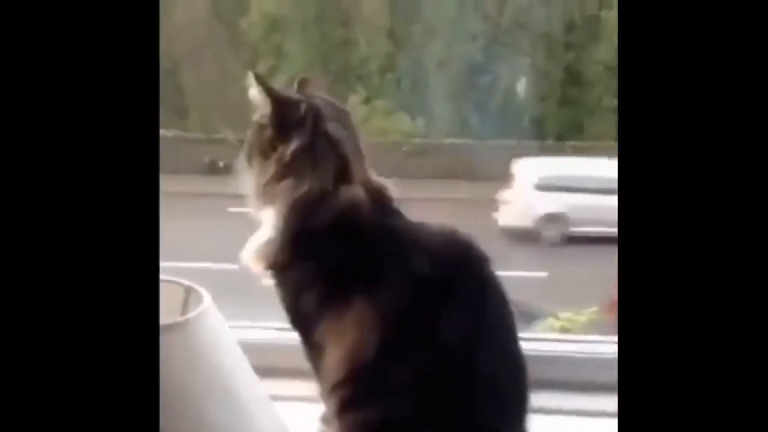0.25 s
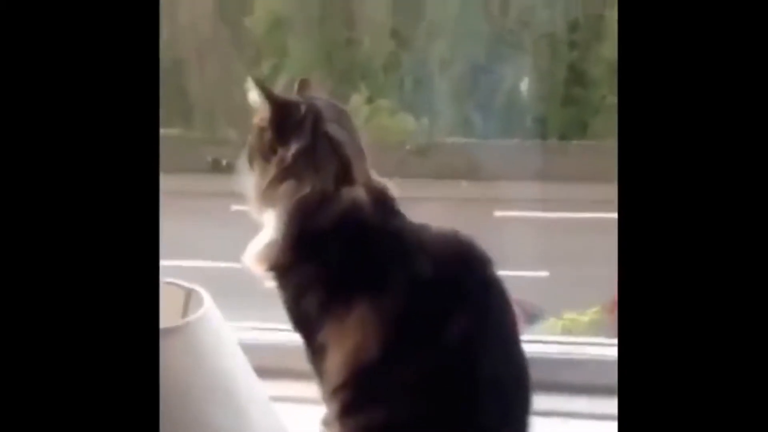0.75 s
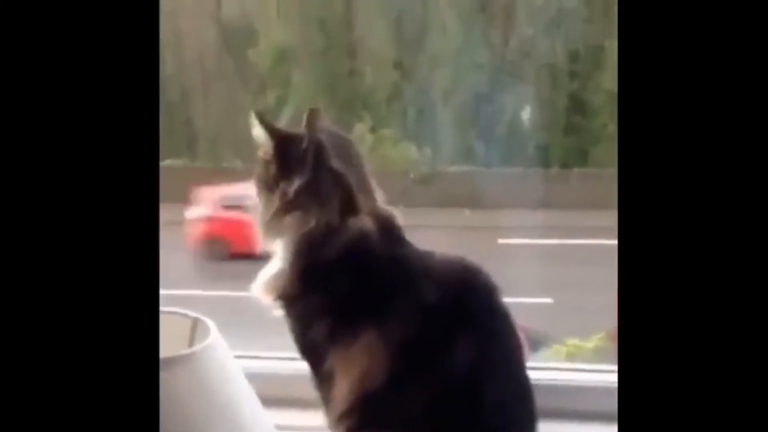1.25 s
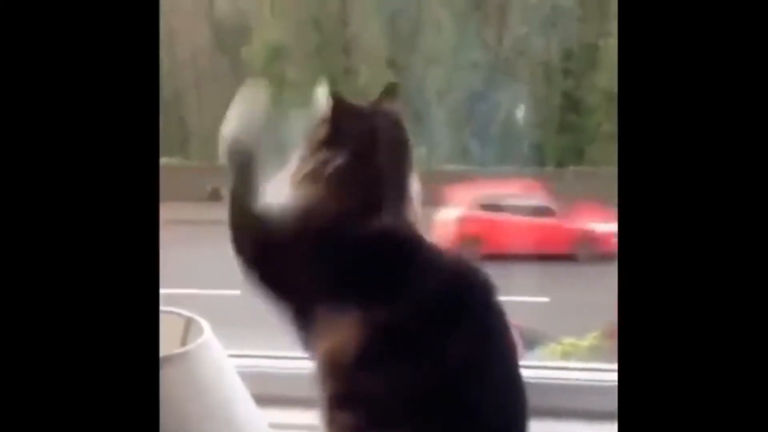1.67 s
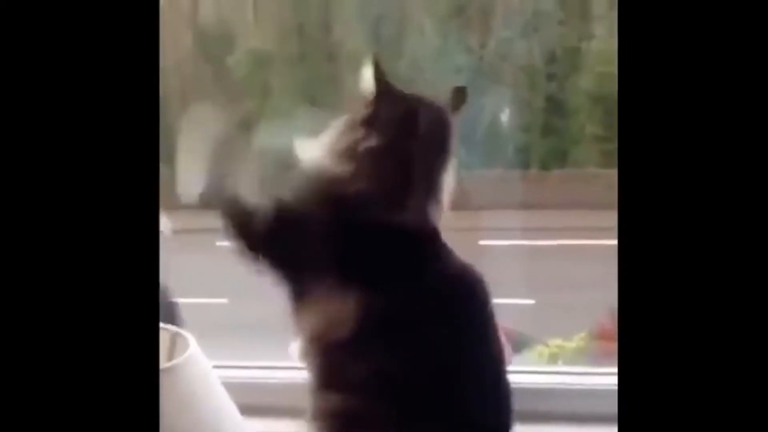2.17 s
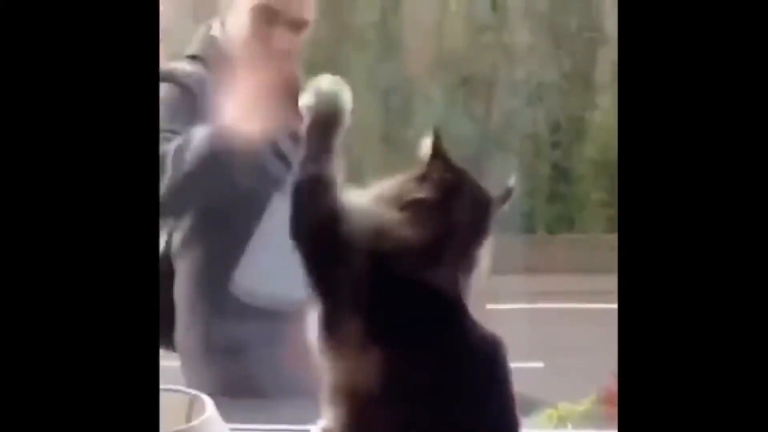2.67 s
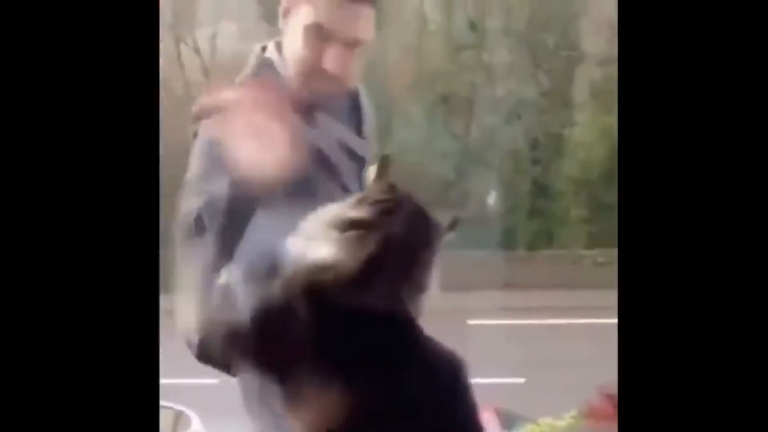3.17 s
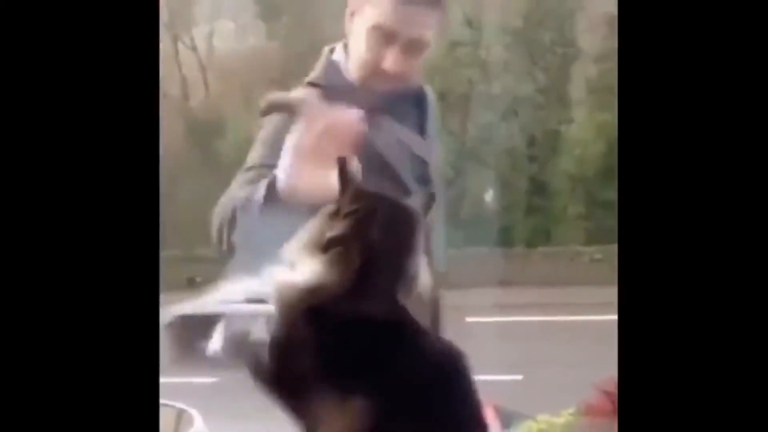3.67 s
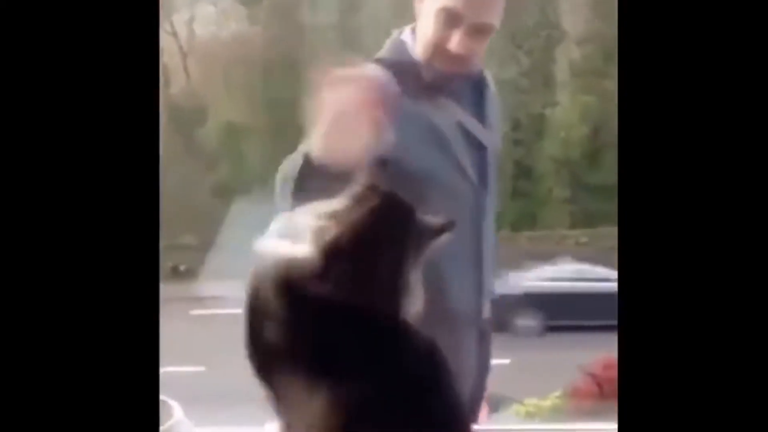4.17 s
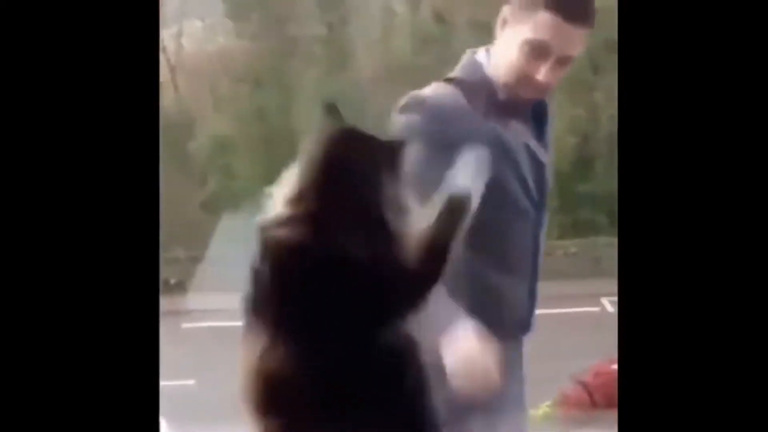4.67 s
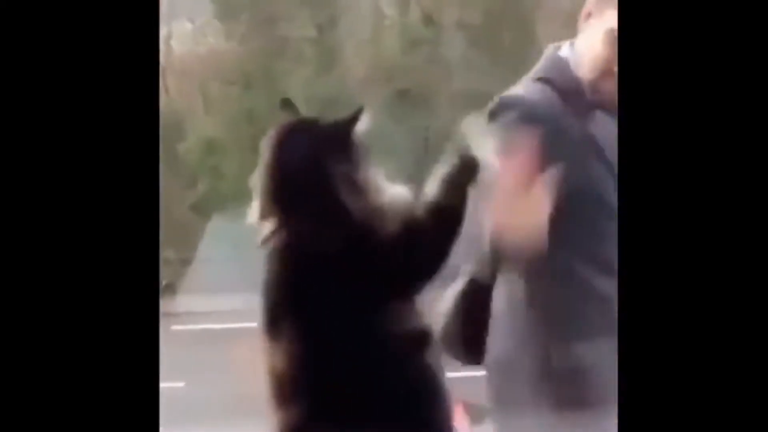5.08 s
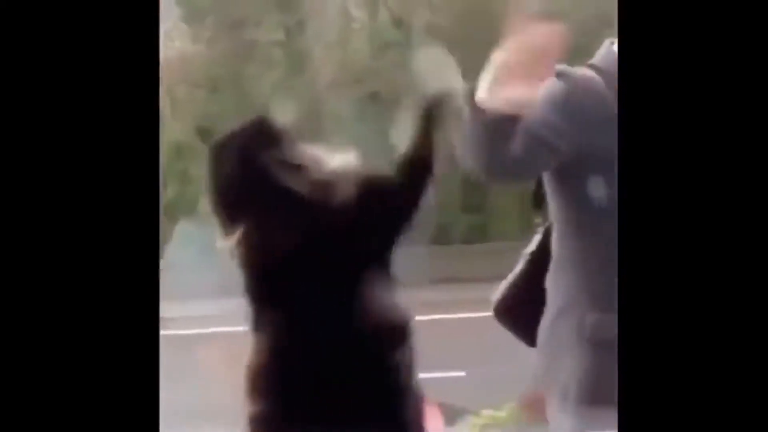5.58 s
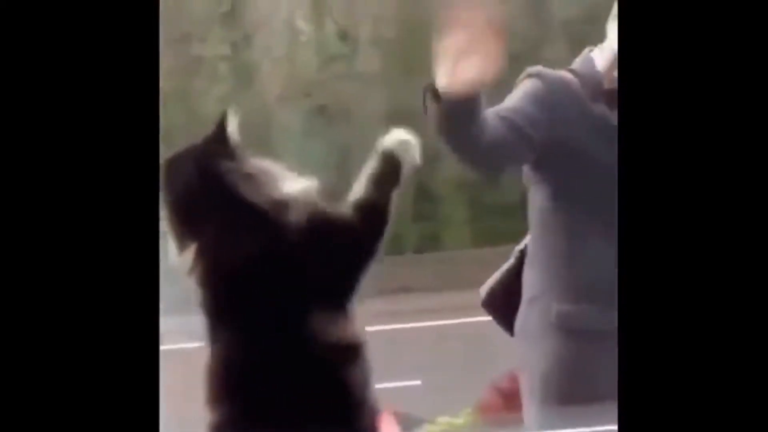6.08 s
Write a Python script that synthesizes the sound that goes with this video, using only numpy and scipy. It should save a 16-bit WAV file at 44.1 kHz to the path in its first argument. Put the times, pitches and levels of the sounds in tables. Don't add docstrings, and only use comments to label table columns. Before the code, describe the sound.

A loud rough scrape and clatter near the microphone, then quiet soft paw thuds and claw scratches on window glass over faint road hum.

```python
import sys
import numpy as np
from scipy import signal
from scipy.fft import rfft, irfft, next_fast_len
from scipy.io import wavfile
from scipy.ndimage import uniform_filter1d

SR = 44100
rng = np.random.default_rng(int(sys.argv[2]) if len(sys.argv) > 2 else 0)


def linear_from_db(decibels):
    return 10 ** (np.asarray(decibels, float) / 20)


def bounce(signal):
    frames = np.transpose(np.atleast_2d(signal))
    limited = np.clip(frames, -1, 1)
    pcm = np.round(limited * 32767).astype(np.int16)
    wavfile.write(sys.argv[1], SR, pcm)


N = 279234
TIME = np.arange(N) / SR

# [f/Hz, level/dB]
HUM_SPECTRUM = [(12, -42.5), (20, -22), (70, -13.5), (107, -12), (190, -6), (221, 2), (244, -10),
                (306, -10.5), (373, -20), (631, -27), (831, -19.5), (991, -30), (2830, -24.5),
                (4230, -22.5), (7900, -26.5), (10300, -83), (17400, -120)]
# [f/Hz, level/dB]
TYRE_SPECTRUM = [(210, -34.5), (350, -7), (535, -6.5), (589, -4.5), (648, -7.5), (1010, -11), (3500, -23.5),
                 (4550, -47), (7700, -120)]
# [nearest t/s, hum level/dB, half length/s]
CARS = [
    (0.0, -65, .2),
    (.38, -65, .1),
    (1.6, -68, .5),
    (2.71, -66, .2),
    (3.55, -67, .2),
    (4.89, -67, .25),
    (5.6, -69, .5),
]
# [t/s, pressure level/dB, speed level/dB]
DRAG = [
    (0.644, -50, 6),
    (0.752, -35, 11),
    (0.774, -25, -1),
    (0.826, -31.5, -2),
    (0.92, -34, 5),
    (0.97, -44, 7),
    (1.0, -33, -15),
    (1.062, -37, -7),
    (1.17, -59, -9),
]
# [t/s, peak level/dB, colour f/Hz, length/s, grit re peak/dB]
JOLTS = [(0.639, -57, 544, 0.012, -22), (0.637, -34, 3000, 0.045, -34), (0.771, -19, 2400, 0.022, -32),
         (0.675, -27, 280, 0.04, -34), (0.713, -17.5, 466, 0.0075, -15), (0.746, -22, 409, 0.014, -22.5),
         (0.765, -11, 600, 0.023, -29.5), (0.788, -20.5, 748, 0.031, -29),
         (0.847, -21.5, 401, 0.013, -24.5), (0.871, -25, 680, 0.016, -22.5),
         (0.898, -19.5, 612, 0.012, -22), (0.919, -31, 460, 0.0081, -24.5), (0.99, -22, 405, 0.014, -35.5),
         (1.015, -29, 1700, 0.045, -36), (1.314, -64, 401, 0.013, -24)]
# [t/s, rumble level/dB]
ROCKS = [
    (1.062, -30),
    (1.234, -51),
    (1.312, -40),
    (1.42, -56),
]
# [f/Hz, level/dB]
GRIND_SPECTRUM = [(130, -31), (220, 2.5), (338, -5.5), (383, -1.5), (433, -11.5), (647, -8.5),
                  (1310, -25.5), (2190, -26.5), (6000, -48), (7800, -82.5), (13200, -120)]
# [f/Hz, level/dB]
GRIT_SPECTRUM = [(2120, -29), (3600, -0.5), (5220, -2.5), (6260, -5.5), (6810, -7.5), (7900, -22),
                 (10300, -45.5), (17400, -120)]
# [f/Hz, level/dB]
RUMBLE_SPECTRUM = [(12, -50.5), (20, -25), (48, 2), (113, 7), (130, 2), (170, -52), (290, -120)]
# [t/s, f/Hz, level/dB]
BOARD_NOTE = [
    (0.64, 188, -56),
    (0.7, 177, -36.5),
    (0.75, 179, -30),
    (0.79, 172, -30),
    (0.848, 160, -28),
    (0.904, 168.6, -31),
    (0.956, 169, -25.5),
    (1.11, 168.4, -29),
    (1.16, 168, -42),
]
# [t/s, peak level/dB, f/Hz]
BUMPS = [
    (0.656, -36.5, 119),
    (0.76, -24, 123),
    (0.989, -30.5, 105.2),
    (1.044, -42, 117.6),
    (1.301, -41.5, 81),
    (5.49, -63, 56),
]
# [t/s, peak level/dB, strongest mode f/Hz]
THUDS = [(1.457, -58.5, 179.5), (1.79, -56.5, 253), (1.895, -50, 221), (1.984, -54, 227), (2.193, -51, 215),
         (2.478, -53, 159), (2.51, -55.5, 214), (2.793, -44.5, 213), (2.829, -53, 235),
         (3.189, -56.5, 165.5), (3.61, -48.5, 224), (3.64, -49, 221), (3.987, -49, 205), (4.009, -54, 169),
         (4.409, -43.5, 245), (4.431, -48.5, 242), (4.462, -55.5, 256), (4.723, -53, 202),
         (4.754, -54, 205), (5.002, -60.5, 202), (5.073, -43.5, 186), (5.292, -59.5, 182),
         (5.454, -53.5, 223), (5.691, -53, 223), (5.871, -47.5, 239), (5.909, -50, 207),
         (6.068, -52.5, 210), (6.309, -49.5, 239)]
# [f/Hz, level/dB, t60/s]
PANE_MODES = [(160, -3.5, 0.24), (214.5, -5, 0.16), (257.2, -3.5, 0.17), (316.8, -3.5, 0.15),
              (397.5, -13.5, 0.14), (524, -14.5, 0.11)]
# [t/s, peak level/dB, colour f/Hz, knock re claw/dB]
CLAW_STROKES = [(1.8846, -48, 1740, -11.5), (1.945, -53, 2720, -14.5), (2.1897, -42, 2370, -12.5),
                (2.2344, -57.5, 3860, -18), (2.4712, -47.5, 2960, -16), (2.542, -54.5, 3870, -19),
                (2.79, -47.5, 3160, -12.5), (3.1716, -63.5, 3170, -7), (3.225, -58, 3220, -11),
                (3.6092, -44.5, 2610, -36), (3.988, -58.5, 3100, -10), (4.027, -59.5, 3410, -6.5),
                (4.3955, -53.5, 3130, -9), (4.427, -59, 4310, -5), (4.8285, -49.5, 3070, -12.5),
                (5.0696, -48, 3370, -30), (5.0755, -39, 3200, -15.5), (5.257, -47, 2830, -21),
                (5.444, -49, 3500, -12), (5.4725, -50.5, 2800, -16), (5.654, -56, 3340, -21),
                (5.683, -51, 2820, -19), (5.8625, -39.5, 3340, -23), (6.0683, -51.5, 3250, -21),
                (6.3065, -58.5, 4070, -19)]
# [f/Hz, level/dB]
CLAW_SPECTRUM = [(900, -7.5), (1450, -3.5), (2000, -2), (3200, -1.5), (4300, -3.5), (5200, -11),
                 (7500, -15)]
# [f/Hz, width/Hz, level/dB]
GLASS_MODES = [(1413, 140, -10), (1902, 86, -4), (2346, 90, -1), (2768, 35, 0), (3130, 26, 0),
               (3467, 69, 0), (4122, 140, -5), (4247, 99, -5), (5020, 100, -12), (5770, 33, -15)]
# [t/s, peak level/dB, f/Hz]
TAG_TICKS = [(2.0423, -76, 4290), (2.0622, -77, 4280), (2.3171, -70, 4390), (2.537, -62, 4250),
             (2.586, -60.5, 4300), (2.6115, -71, 4300), (2.6349, -62, 4250), (2.6746, -65, 4380),
             (2.6888, -64, 4370), (4.0163, -72, 4500), (4.7431, -61.5, 4300), (5.1583, -66, 4280),
             (5.3375, -57.5, 4290), (5.3594, -63, 4320), (5.5548, -65.5, 4300)]

HUM_DB, FAR_TYRES_DB, HISS_DB = -71, -77, -73.3
LEAVING_DB, LEAVING_DB_PER_S = -70, 15
DRAG_ATTACK_DB_PER_S, SETTLE_DB_PER_S = 950, 110
# (dB re pressure, dB per dB of speed)
RUMBLE_LAW, RASP_LAW, GRIT_LAW = (-2, .45), (-14, .65), (-25, 1.05)
ROCK_S, ROCK_GRIND_DB = .016, -11
WOBBLE_DB, WOBBLE_DB_PER_S = -52, 40
BOARD_HZ, BOARD_WIDTH_HZ = 167., 45.
BOARD_FADE_DB_PER_S, RUB_ENDS_S = 55, 1.25
LOOSE_DB, LOOSE_DB_PER_DB, FIRM_NOTE_DB, FREE_LOOSE_DB = -6.5, .5, -29, 4
SKID_S, SKID_S_PER_DB, FIRM_DB = .022, .0007, -50
ROOM_T60_S, CLAW_ROOM_DB, TAG_ROOM_DB, THUD_ROOM_DB = 0.34, -4.5, -7, -7.5
SPLIT_DB, SPLIT_PER_S, SPLIT_S = -72., 11, .045
TOP_HZ = 7950


def level(x, db):
    return x * linear_from_db(db) / np.sqrt(np.mean(x ** 2))


def colour(x, points):
    hz, db = np.transpose(points)
    size = next_fast_len(len(x), real=True)
    log_hz = np.log(np.fft.rfftfreq(size, 1 / SR) + 1)
    gain = linear_from_db(np.interp(log_hz, np.log(hz), db, left=-120, right=-120))
    return irfft(rfft(x, size) * gain, size)[:len(x)]


def part(points, lo_hz, hi_hz):
    table_hz, table_db = np.array(points)[:, 0], np.array(points)[:, 1]
    hz = np.geomspace(lo_hz, hi_hz * 1.5, num=24)
    db = np.interp(np.log(hz), np.log(table_hz), table_db)
    outside = np.maximum(1, np.maximum(lo_hz / hz, hz / hi_hz))
    return np.c_[hz, db - 30 * np.log2(outside)]


def ring(x, hz, t60_s):
    pole = np.exp((2j * np.pi * hz - np.log(1000) / t60_s) / SR)
    return signal.lfilter([1], [1, -pole], x).imag


def band(x, hz, width_hz):
    return signal.lfilter(*signal.iirpeak(hz, hz / width_hz, fs=SR), x)


def walk(rate_hz):
    k = int(SR / rate_hz)
    steps = np.repeat(rng.standard_normal(N // k + 1), k)
    return 0.8 * uniform_filter1d(uniform_filter1d(steps, k), k)[:N]


def held(s, db, fade_db_per_s):
    early_s, late_s = np.maximum(s[0] - TIME, 0), np.maximum(TIME - s[-1], 0)
    return np.interp(TIME, s, db) - DRAG_ATTACK_DB_PER_S * early_s - fade_db_per_s * late_s


def add(out, s, x, db):
    i = int(s * SR)
    out[i:i + len(x)] += (x * linear_from_db(db) / np.abs(x).max())[:N - i]


def grains(size, spread_db):
    return rng.standard_normal(size) * linear_from_db(spread_db * rng.exponential(size=size))


def skid(length_s, hz, sharp):
    t = TIME[:4096] / max(length_s, .008)
    shape = np.minimum(t / .2, 1) / (1 + t ** 4)
    return band(grains(size=len(t), spread_db=2.4) * shape, hz, hz / sharp)


def room(x, wet_db):
    t = TIME[:22050]
    echoes = rng.standard_normal(len(t))
    tail = echoes * np.abs(echoes) * linear_from_db(-60 * t / ROOM_T60_S) * np.minimum(t / 0.016, 1)
    return x + linear_from_db(wet_db) * signal.fftconvolve(x, tail / np.sqrt(np.sum(tail ** 2)))[:N]


def drifting_noise(hz, depth_db, rate_hz):
    noise = colour(rng.standard_normal(N), part(HUM_SPECTRUM, hz, 1.5 * hz))
    return noise * linear_from_db(depth_db * walk(rate_hz))


def background():
    hum = sum(drifting_noise(hz, 2.0, 7.7) for hz in 25 * 1.441 ** np.arange(8))
    tyres = colour(rng.standard_normal(N) * linear_from_db(2.2 * walk(12)), TYRE_SPECTRUM)
    hiss = sum(drifting_noise(hz, 1.2, 4.7) for hz in 1300 * 1.5 ** np.arange(5))
    passes = sum(linear_from_db(db) ** 2 / (1 + ((TIME - s) / half_s) ** 4) for s, db, half_s in CARS)
    swell = np.sqrt(linear_from_db(HUM_DB) ** 2 + passes)
    leaving = linear_from_db(LEAVING_DB - LEAVING_DB_PER_S * TIME)
    near = level(band(tyres, 1300., 2200.), 0) * leaving
    return level(hum, 0.51) * swell + level(tyres, FAR_TYRES_DB) + near + level(hiss, HISS_DB)


def drag():
    s, pressure_db, speed_db = np.transpose(DRAG)
    pressure_db = held(s, pressure_db, SETTLE_DB_PER_S)
    speed_db = np.interp(TIME, s, speed_db)
    rumble, rasp, grit = (linear_from_db(pressure_db + db + slope * speed_db)
                          for db, slope in (RUMBLE_LAW, RASP_LAW, GRIT_LAW))
    rocks = sum(linear_from_db(db) * np.exp(-np.abs(TIME - at_s) / ROCK_S) for at_s, db in ROCKS)
    rocks = rocks + linear_from_db(held([s[-1]], [WOBBLE_DB], WOBBLE_DB_PER_S))

    rub = grains(size=N, spread_db=2.0) * linear_from_db(1.97 * walk(60.08))
    resonances = [(390., 19.0), (640., 71.0), (820., 40.), (1420., 120.0), (2200., 210.0)]  # f/Hz, width/Hz
    rub = rub + 0.5 * sum(band(rub, hz, width_hz) for hz, width_hz in resonances)

    low = colour(rng.standard_normal(N) * linear_from_db(1.5 * walk(25)), RUMBLE_SPECTRUM)
    out = level(low, -2.5) * (rumble + rocks)
    out += level(colour(rub, GRIT_SPECTRUM), -0.99) * grit
    grinds = [(210, 1200, linear_from_db(pressure_db)), (210, 520, linear_from_db(ROCK_GRIND_DB) * rocks), (1390, 3300, rasp)]
    for lo_hz, hi_hz, gain in grinds:
        out += level(colour(rub, part(GRIND_SPECTRUM, lo_hz, hi_hz)), -1.2) * gain
    for s, db, hz, length_s, grit_db in JOLTS:
        body = band(band(skid(length_s, hz, sharp=1.0), hz, 2.5 * hz), hz, 2400.)
        add(out, s - .003, body, db - 8.8)
        scratch = band(skid(2.1 * length_s, 5500., sharp=1.3), 4500.0, 3500.)
        add(out, s - .003, scratch, db + grit_db - 4.0)
    return out


def board():
    s, hz, db = np.transpose(BOARD_NOTE)
    db = held(s, db, BOARD_FADE_DB_PER_S)
    rubbed_db = np.minimum(LOOSE_DB + LOOSE_DB_PER_DB * (FIRM_NOTE_DB - db), 0)
    loose = linear_from_db(np.where(TIME > RUB_ENDS_S, FREE_LOOSE_DB, rubbed_db))
    shake = band(band(rng.standard_normal(N), BOARD_HZ, BOARD_WIDTH_HZ), BOARD_HZ, 90.)
    pitch_hz = np.interp(TIME, s, hz) * (1 + 0.0408 * walk(44.58))
    phase = 2 * np.pi * np.cumsum(pitch_hz) / SR
    note = (1.53 * np.sin(phase) + loose * level(shake, 0)) / np.sqrt(1 + loose ** 2)
    out = note * linear_from_db(db + 1.45 * walk(40.5))
    t = TIME[:4096]
    for s, db, hz in BUMPS:
        add(out, s - .006, np.sin(2 * np.pi * hz * t) * t * np.exp(-t / .007), db + 3.1)
    return out


def thuds():
    out, t = np.zeros(N), TIME[:8192]
    for s, db, hz in THUDS:
        noise = band(band(rng.standard_normal(len(t)), 236.0, 240.0), 247.0, 400.)
        push = t * np.exp(-t / 0.0068) * noise
        luck = rng.standard_normal((len(PANE_MODES), 2))
        pane = sum(linear_from_db(mode_db + 2.2 * a) * ring(push, f * (1 + 0.03 * b), t60_s)
                   for (f, mode_db, t60_s), (a, b) in zip(PANE_MODES, luck))
        add(out, s - .005, pane + ring(push, hz, 0.14), db + 0.93)
    return out


def claws():
    out = np.zeros(N)
    for s, db, hz, knock_db in CLAW_STROKES:
        length_s = SKID_S + SKID_S_PER_DB * (FIRM_DB - db)
        scrape = colour(skid(length_s, hz, sharp=1.47), CLAW_SPECTRUM)
        luck = rng.standard_normal((len(GLASS_MODES), 2))
        modes = sum(linear_from_db(2.4 * a) * band(scrape, f * (1 + 0.027 * b), 150.0)
                    for (f, _, _), (a, b) in zip(GLASS_MODES, luck))
        add(out, s - .003, scrape + 0.45 * modes, db + 1.0)
        knock = band(skid(length_s, 800., sharp=0.83), 800., 700.)
        add(out, s - .003, knock, db + knock_db + 0.11)
    return out


def tag():
    out, t = np.zeros(N), TIME[:8192]
    for s, db, hz in TAG_TICKS:
        tick = np.exp(-t / .004) * (np.cos(2 * np.pi * hz * t) + 2.5 * rng.standard_normal(8192))
        rings = ring(tick, hz, 0.09)
        rings = rings + .3 * ring(tick, 1.025 * hz, 0.038) + 0.22 * ring(tick, 0.84 * hz, 0.056)
        add(out, s - .002, rings, db - 3.2)
    return out


def scene():
    mid = background() + drag() + board()
    mid = mid + room(thuds(), THUD_ROOM_DB) + room(claws(), CLAW_ROOM_DB) + room(tag(), TAG_ROOM_DB)
    return np.array([mid, mid])


def thin(x):
    f, _, z = signal.stft(x, SR, nperseg=2048)
    power = np.abs(z) ** 2
    luck = np.repeat(rng.standard_normal((17, z.shape[1])), 64, axis=0)[:len(f)]
    greed = linear_from_db(np.minimum(-4.5 + 4 * luck, -1))
    keep = (power > greed ** 2 * uniform_filter1d(power, size=12, axis=0)) | (f[:, None] < 500)
    return signal.istft(z * keep, SR, nperseg=2048)[1][:N]


def splits():
    out, size = np.zeros(N), int(SPLIT_S * SR)
    for when, pitch, strength in rng.random((int(SPLIT_PER_S * N / SR), 3)):
        hz = 4200 + 2900 * pitch
        edges = [(hz - 400, -40), (hz - 350, 0), (hz + 350, 0), (hz + 400, -40)]
        patch = colour(rng.standard_normal(size) * np.hanning(size), edges)
        add(out, when * N / SR, patch, SPLIT_DB + 12 - 16 * strength)
    return out


def top_cut(x):
    return signal.sosfilt(signal.butter(12, 8060, fs=SR, output="sos"), x)


def record(dry):
    limited = dry[0] / (1 + (dry[0] / .145) ** 8) ** (1 / 8)
    low_pass = signal.ellip(10, .2, 45, TOP_HZ, fs=SR, output="sos")
    mid = thin(signal.sosfilt(low_pass, limited))
    mix = mid + splits() * np.array([[1], [-1]])
    return top_cut(mix)


dry = scene()
out = record(dry)
bounce(out)
```